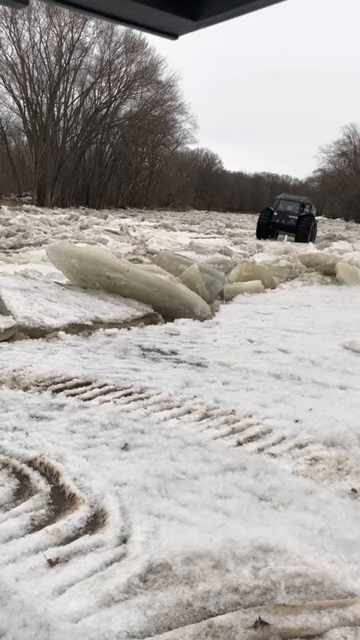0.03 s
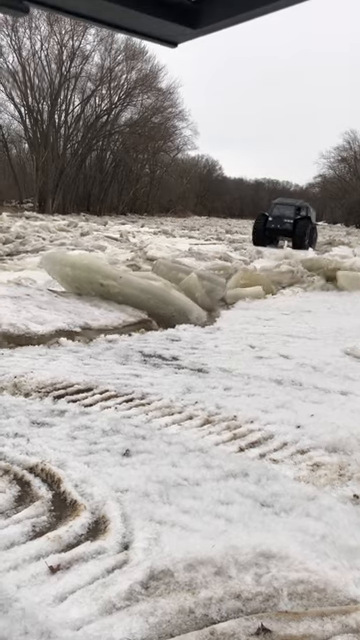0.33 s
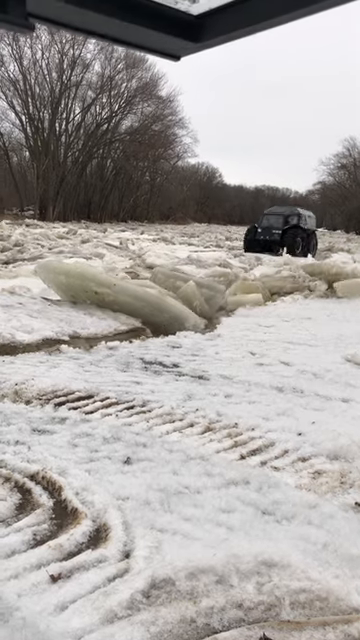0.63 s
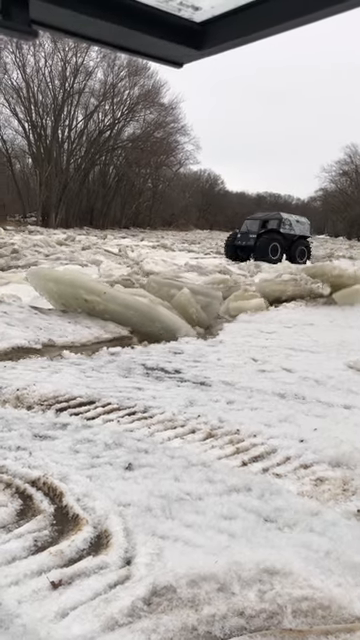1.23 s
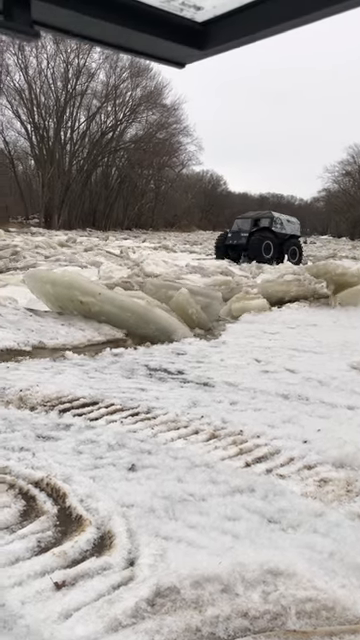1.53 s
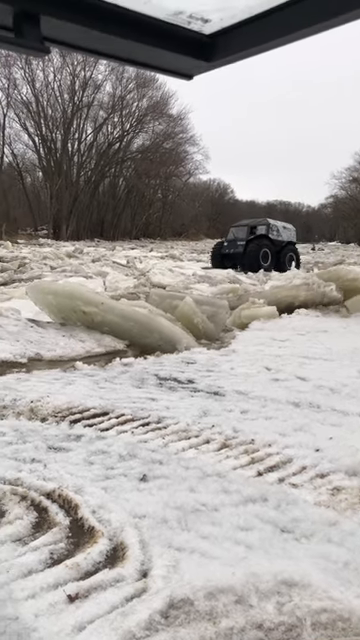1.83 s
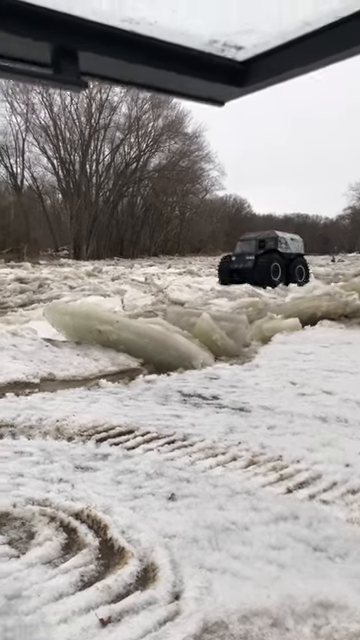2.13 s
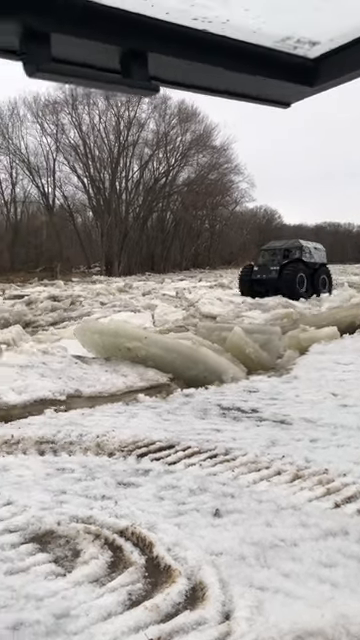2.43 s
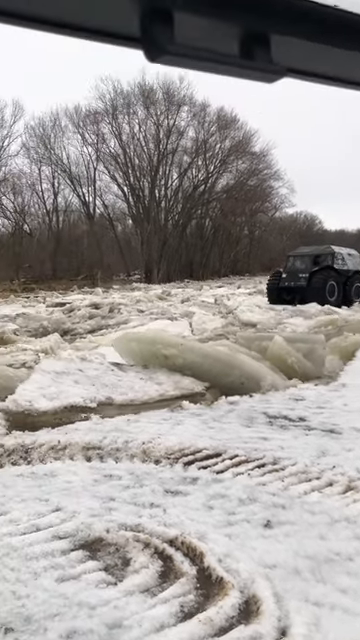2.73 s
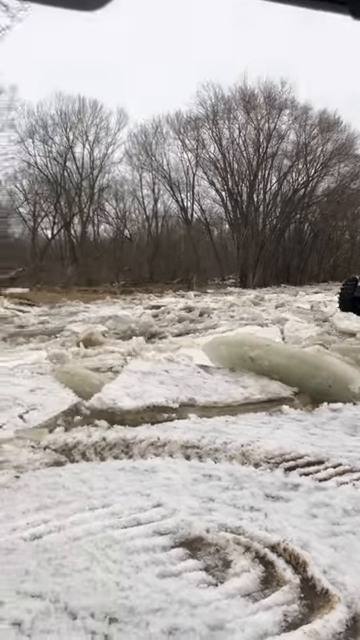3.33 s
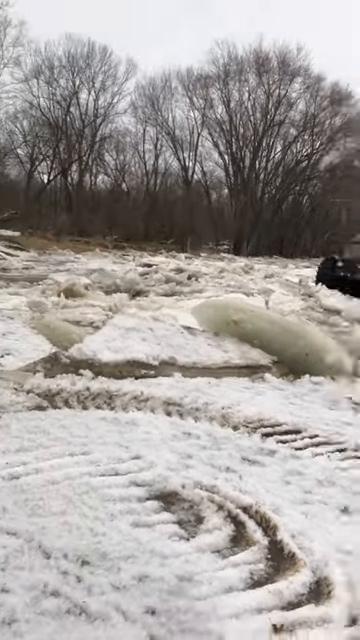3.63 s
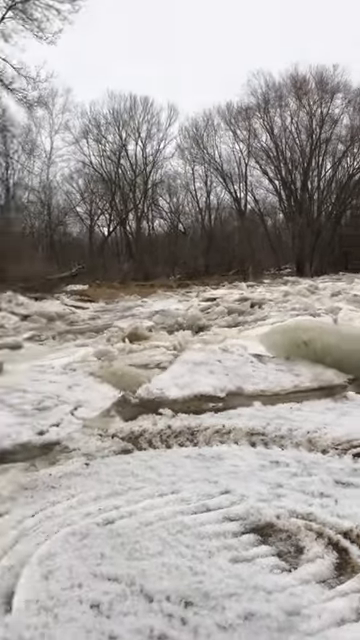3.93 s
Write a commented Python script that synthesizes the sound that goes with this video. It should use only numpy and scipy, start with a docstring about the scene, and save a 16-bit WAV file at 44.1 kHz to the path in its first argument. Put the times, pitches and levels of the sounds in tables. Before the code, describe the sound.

Diesel engines throb and clatter as a big-wheeled vehicle crawls closer over snow and ice.

```python
"""A diesel idles close by, its periodic firings driving a throb of exhaust harmonics, rumble and thrum.
A big-wheeled all-terrain vehicle crawls closer over broken river ice: combustion knocks rattle its
engine and excite the modes of its block and panels, and the clatter grows as it nears.
Its tyres churn wet snow, a hiss of many tiny impacts, and now and then crush a piece of ice."""
import sys
import numpy as np
from scipy import signal
from scipy.fft import rfft, irfft, next_fast_len
from scipy.io import wavfile
from scipy.ndimage import uniform_filter1d, map_coordinates

SR = 44100
rng = np.random.default_rng(int(sys.argv[2]) if len(sys.argv) > 2 else 0)


def generate_wav(sig):
    """Save sig (samples, or channels by samples) to the path in sys.argv[1] as 16-bit PCM at SR."""
    pcm = np.round(np.clip(np.atleast_2d(sig).T, -1, 1) * 32767).astype(np.int16)
    wavfile.write(sys.argv[1], SR, pcm)


N = 176400
TIME_S = np.arange(N) / SR


def amp(db):
    """Decibels to amplitude ratio."""
    return 10 ** (np.asarray(db) / 20)


def unit(x):
    """Normalisation to rms 1."""
    return x / np.sqrt(np.mean(x ** 2) + 1e-20)


def curves(rows):
    """Linear interpolation: one value per sample for each column after the time."""
    times, *columns = np.transpose(rows)
    return [np.interp(TIME_S, times, column) for column in columns]


def wobble(rate_hz):
    """Random modulation: a spline through rate_hz random values a second."""
    return map_coordinates(rng.standard_normal(1024), [TIME_S * rate_hz + 2], mode="wrap")


def filtered(x, response):
    """Linear filtering: the spectrum of x times a frequency response."""
    size = next_fast_len(N + SR // 2)
    return irfft(rfft(x, size) * response(np.fft.rfftfreq(size, 1 / SR)), size)[:N]


def coloured(x, spectrum):
    """Spectral shaping by (frequency_hz, gain_db) points, at rms 1."""
    points_hz, gain_db = np.transpose(spectrum)
    return unit(filtered(x, lambda hz: amp(np.interp(np.log(hz + 1), np.log(points_hz), gain_db))))


def band(x, centre_hz, half_octaves, power):
    """Band-pass filtering: the amplitude halves at half_octaves either side of the centre."""
    return filtered(x, lambda hz: 1 / (1 + (np.log2((hz + 1) / centre_hz) / half_octaves) ** power))


def patchy(x, depth_db, cells):
    """Spectral fluctuation: brief random peaks and dips, at rms 1."""
    spectra = signal.stft(x, nperseg=1024)[2]
    field = rng.standard_normal(spectra.shape)
    field = uniform_filter1d(uniform_filter1d(field, cells, 0), cells, 1)
    return unit(signal.istft(spectra * amp(depth_db * unit(field)), nperseg=1024)[1][:N])


def puffs(firings, decay_cycles, steady, scatter_db):
    """Pulsed excitation: noise bursts at each firing and decays exponentially to a steady floor."""
    strength = amp(scatter_db * rng.standard_normal(1024))[firings.astype(int) % 1024]
    return rng.standard_normal(N) * (steady + strength * np.exp(-(firings % 1) / decay_cycles))


def exhaust(turns, turned, waver_db, jitter_turns):
    """Harmonics of the shaft rate, dispersed by the pipe; those above the firing tone waver in level."""
    # exhaust harmonics before and after the listener turns: shaft_order, before_db, after_db
    harmonics = [(1, -14, -11.5), (2, 1.5, 1), (3, -17, -12), (4, -13, -8.5), (5, -14.5, -15.5),
                 (6, -17.5, -22.5), (7, -27.5, -13), (8, -21.5, -10.5), (10, -29, -26)]
    tones = np.zeros(N)
    phase = 2 * np.pi * (turns + jitter_turns * wobble(22))
    for order, before_db, after_db in harmonics:
        level_db = before_db + turned * (after_db - before_db) + waver_db * wobble(7) * (order > 2)
        dispersion = (order - 2) ** 2 / 6
        tones += amp(level_db) * np.cos(order * phase + dispersion)
    return np.sqrt(2) * tones


def idling_engine(shaft_hz=35.235, turning_s=(1.78, 3.03)):
    """Periodic forcing: two firings a revolution drive the exhaust tones, rumble and block's thrum."""
    # relative exhaust levels: time_s, tones_db, rumble_db
    levels = [(.1, -30, -33.5), (.55, -27.5, -35), (1.1, -27.5, -33.5), (1.7, -28, -32.5), (2.3, -27, -33),
              (2.8, -28.5, -33), (3.35, -29.5, -32), (4, -30, -31.5)]
    # rumble spectrum before the listener turns: frequency_hz, gain_db
    rumble_before = [(20, -37), (42, -29), (61, 1), (85, -2), (125, -2.5), (172, 1), (210, -5.5), (295, -6),
                     (370, -14.5), (600, -25.5), (1500, -45)]
    # rumble spectrum after the listener turns: frequency_hz, gain_db
    rumble_after = [(20, -35), (42, -20), (61, 2), (100, 3.5), (150, 1.5), (205, 0), (250, -1.5), (300, -3),
                    (345, -13.5), (400, -21), (600, -34), (1500, -60)]
    # spectrum of the vibrating block: frequency_hz, gain_db
    block = [(200, -27), (370, -4), (500, -3.5), (610, -3), (740, -3.5), (880, -3.5), (1100, -16),
             (2500, -40)]
    tones_db, rumble_db = curves(levels)
    turns = np.cumsum(shaft_hz + .11 * wobble(5)) / SR
    turned = np.interp(TIME_S, turning_s, [0, 1])  # the exhaust changes colour as the listener turns
    gas = puffs(2 * turns, decay_cycles=.5, steady=.58, scatter_db=.9)
    rumble = (1 - turned) * coloured(gas, rumble_before) + turned * coloured(gas, rumble_after)
    thrum_db = -45 + .77 * wobble(8.1)
    thrum = coloured(puffs(2 * turns, decay_cycles=.42, steady=.7, scatter_db=2.5), block)
    tones = exhaust(turns, turned, waver_db=1.25, jitter_turns=.0052)
    return amp(tones_db - .5) * tones + amp(rumble_db - 1.5) * rumble + amp(thrum_db) * thrum


def ringing(x, modes):
    """Modal response: x drives damped resonators, summed with alternating sign, at rms 1."""
    def response(hz):
        return sum((-1) ** k * amp(db) * 1j * hz * width / (pitch ** 2 - hz ** 2 + 1j * hz * width)
                   for k, (pitch, width, db) in enumerate(modes))
    return unit(filtered(x, response))


def clatter(firing_hz=100.1, nearing_s=(2, 2.7)):
    """Impact excitation: uneven knocks rattle the approaching diesel and ring its block and panels."""
    # rattle level and emphasis of its upper range: time_s, level_db, emphasis_db
    rattle_levels = [(.1, -50.5, 0), (.7, -47, -1), (1, -45.5, -0.5), (1.5, -43, -1), (1.75, -45.5, 2),
                     (2.25, -44, 1.5), (2.38, -39.5, -3.5), (2.5, -41.5, -1), (2.6, -41, -0.5),
                     (2.75, -41, 0.5), (3.45, -42, 0), (3.7, -41, 1.5), (4, -37.5, 1)]
    # rattle spectrum when far: frequency_hz, gain_db
    far_spectrum = [(400, -21), (850, -5), (1050, -2), (1220, 2.5), (1400, 1), (1700, 0.5), (2100, -3),
                    (2800, -7.5), (3700, -14), (6000, -18.5), (12000, -42)]
    # rattle spectrum when near: frequency_hz, gain_db
    near_spectrum = [(400, -22), (800, -3.5), (1060, 0.5), (1400, -2.5), (1750, -4), (2150, -8.5),
                     (2700, -11), (3600, -9.5), (6000, -16), (12000, -45)]
    # strength of the ringing: time_s, level_db
    ring_levels = [(.1, -48), (.85, -49), (1.0, -43), (1.42, -43), (1.7, -46.5), (2.2, -44), (2.6, -45.5),
                   (3, -43.5), (4, -45)]
    # modes of the block and panels: pitch_hz, bandwidth_hz, far_db, near_db
    modes = [(460, 17, -2, -4), (535, 8.8, -5, -7), (602, 34, -0.5, -3), (724, 20.5, 3, 1.5),
             (777, 12, -0.5, -0.5), (944, 30, -5, -1.5), (1052, 30, -7.5, -2), (1180, 43, -8, -3),
             (1537, 31, -10, -11), (1694, 35, -7.5, -10), (1767, 34, -7.5, -8), (2020, 58, -25, -11)]
    rattle_db, emphasis_db = curves(rattle_levels)
    ring_db, = curves(ring_levels)
    near = np.interp(TIME_S, nearing_s, [0, 1])
    firings = np.cumsum(firing_hz + 3 * wobble(6)) / SR
    knocks = puffs(firings, decay_cycles=.5, steady=1, scatter_db=2.5)
    rattle = (1 - near) * coloured(knocks, far_spectrum) + near * coloured(knocks, near_spectrum)
    rattle = patchy(rattle, depth_db=2.5, cells=3)
    rattle += (amp(emphasis_db) - 1) * band(rattle, centre_hz=1740, half_octaves=.31, power=4)
    blows = puffs(firings, decay_cycles=.32, steady=.53, scatter_db=2)
    far_modes, near_modes = np.array(modes)[:, :3], np.array(modes)[:, [0, 1, 3]]
    ring = (1 - near) * ringing(blows, far_modes) + near * ringing(blows, near_modes)
    return amp(rattle_db + .51 * wobble(45)) * rattle + amp(ring_db) * ring


def grains(rate_hz, spread_db):
    """Shot noise: tiny random impacts of uneven size, at rms 1."""
    hits = rng.random(N) < rate_hz / SR
    return unit(hits * rng.standard_normal(N) * amp(spread_db * rng.standard_normal(N)))


def tyres():
    """Granular noise: treads churn wet snow into slush and fine spray, dense impacts on a hiss."""
    # relative levels of the churned snow: time_s, slush_db, spray_db
    levels = [(0.1, -48.5, -49), (0.14, -48, -49), (0.18, -50, -50.5), (0.56, -49.5, -49.5),
              (0.75, -46, -48.5), (0.81, -48.5, -51), (1.11, -49.5, -55), (1.55, -45, -53),
              (1.65, -45.5, -46.5), (1.83, -43.5, -45.5), (1.89, -46, -46.5), (2.08, -42, -45),
              (2.1, -44.5, -46), (2.38, -44.5, -49.5), (2.52, -47, -48.5), (2.64, -43, -47),
              (2.66, -47.5, -47), (3.08, -45, -47), (3.12, -48.5, -48.5), (3.23, -43.5, -44.5),
              (3.31, -47, -46), (4.0, -45, -45)]
    # slush spectrum: frequency_hz, gain_db
    slush_spectrum = [(1000, -6.5), (2800, -4.5), (3950, -3.5), (4300, 1), (4750, -1), (5200, 0),
                      (5800, -1), (6500, -0.5), (7200, -4), (9500, -7.5), (12000, -17.5), (16000, -41)]
    # spray spectrum: frequency_hz, gain_db
    spray_spectrum = [(2500, 1), (6000, -11.5), (8000, 1.5), (10000, 0.5), (12500, 0), (16000, -1.5)]
    slush_db, spray_db = curves(levels)
    churn = rng.standard_normal(N) + .44 * grains(rate_hz=2500, spread_db=3.5)
    slush = patchy(coloured(churn, slush_spectrum), depth_db=1.7, cells=4)
    droplets = rng.standard_normal(N) + .48 * grains(rate_hz=3200, spread_db=2)
    spray = coloured(droplets, spray_spectrum)
    flutter = amp(.58 * wobble(35.03))
    return flutter * (amp(slush_db + 1.5) * slush + amp(spray_db + 3.5) * spray)


def ice_crunches():
    """Brittle fracture: each piece crushed by a tyre gives a short swell of crackle around its pitch."""
    # crushed pieces of ice: peak_s, width_s, level_db, pitch_hz
    pieces = [(0.139, .012, -44, 8900), (.69, .035, -46, 7800), (0.737, 0.027, -45.5, 5000),
              (0.74, .025, -46, 9500), (1.496, .03, -53, 2300), (1.78, .06, -49, 13000),
              (2.064, 0.013, -50, 6000), (2.57, 0.029, -42, 2180), (2.63, .02, -45, 10100),
              (3.164, .01, -40, 3700), (3.199, .007, -37, 3440), (3.235, .035, -44, 9100)]
    crunches = np.zeros(N)
    for peak_s, width_s, level_db, pitch_hz in pieces:
        crackle = band(grains(rate_hz=8300, spread_db=2), pitch_hz, half_octaves=.36, power=2)
        swell = np.exp(-2 * ((TIME_S - peak_s) / width_s) ** 2)
        crunches += amp(level_db) * unit(crackle) * swell
    return crunches


def scene():
    """Superposition in the open air: both engines, the tyres and the breaking ice."""
    return (idling_engine() + clatter() + tyres() + ice_crunches())[None]


def record(dry):
    """Gating and band limiting: the sound starts abruptly and lacks the highest treble."""
    start_s, cutoff_hz = .083, 15800
    gated = dry[0] * (TIME_S > start_s)
    return filtered(gated, lambda hz: np.clip((cutoff_hz - hz) / 300 + .5, 0, 1))[None]


dry = scene()
out = record(dry)
generate_wav(out)
```